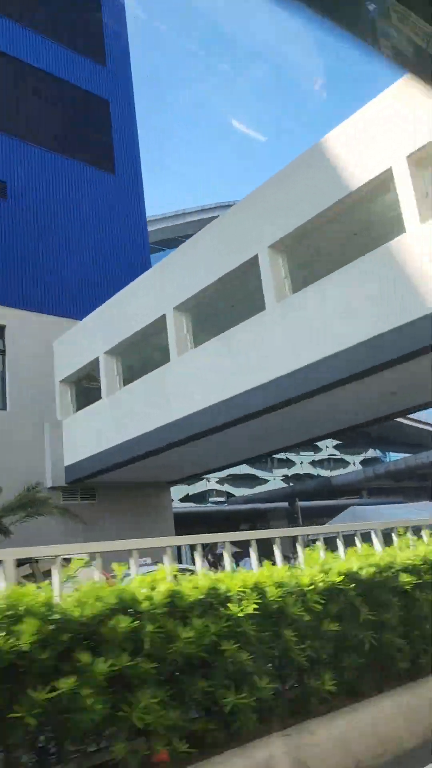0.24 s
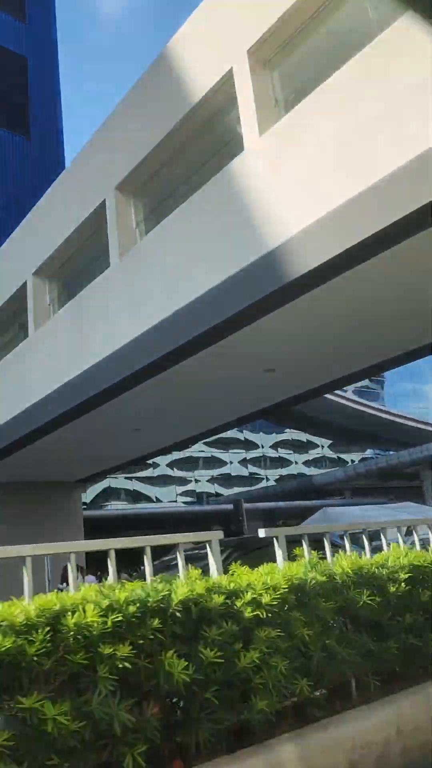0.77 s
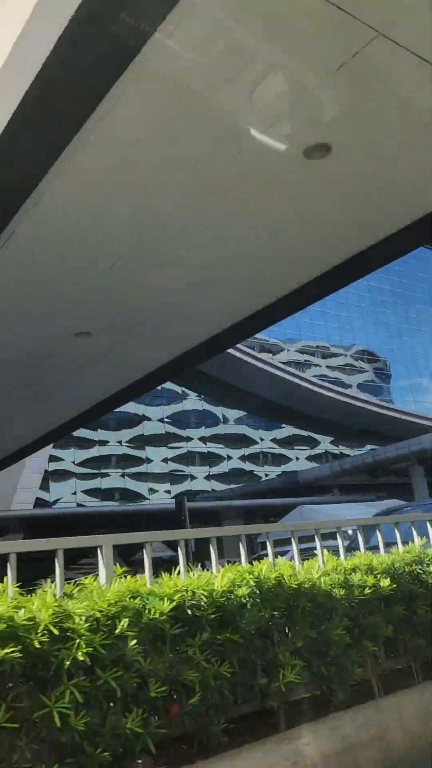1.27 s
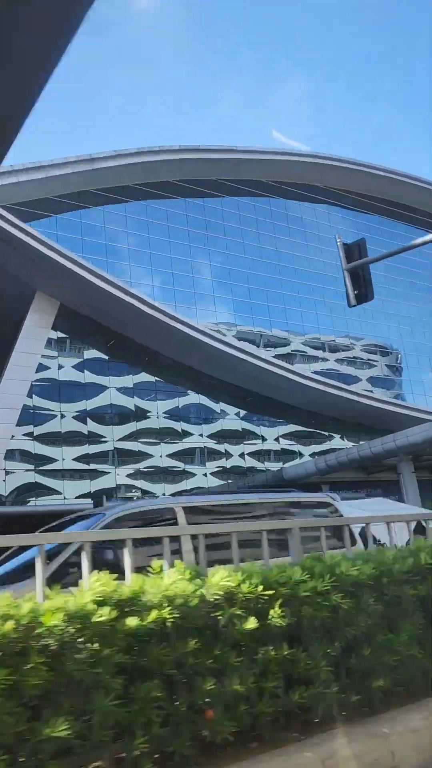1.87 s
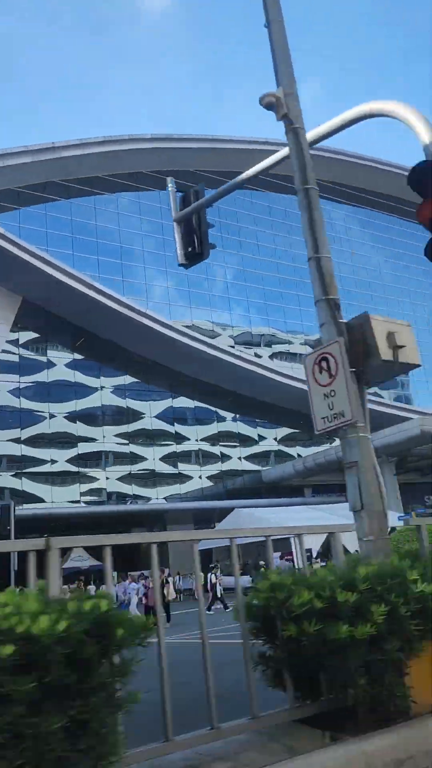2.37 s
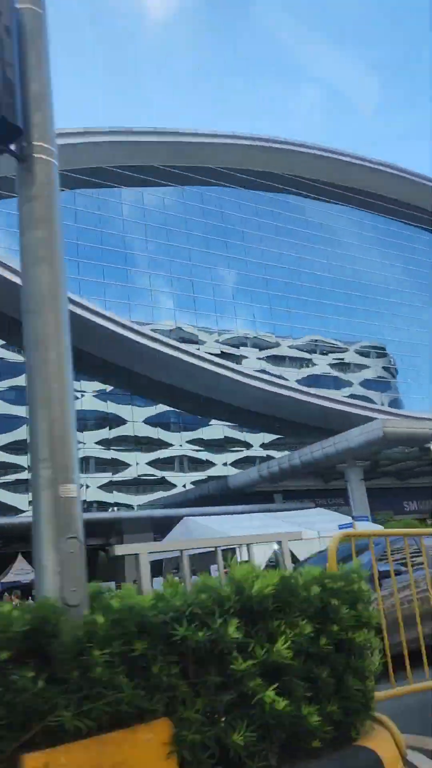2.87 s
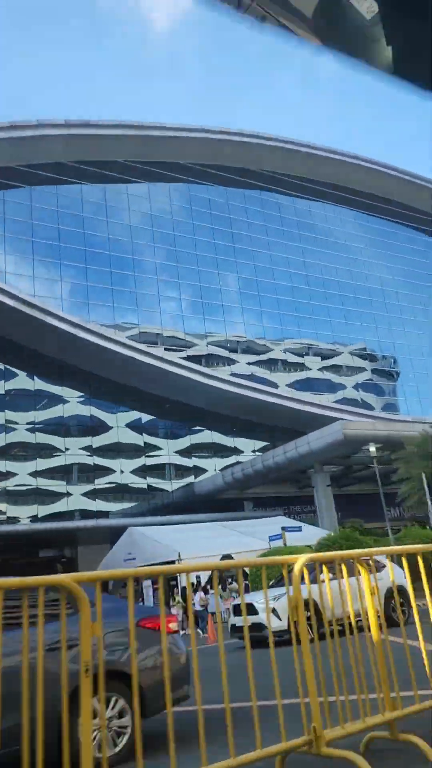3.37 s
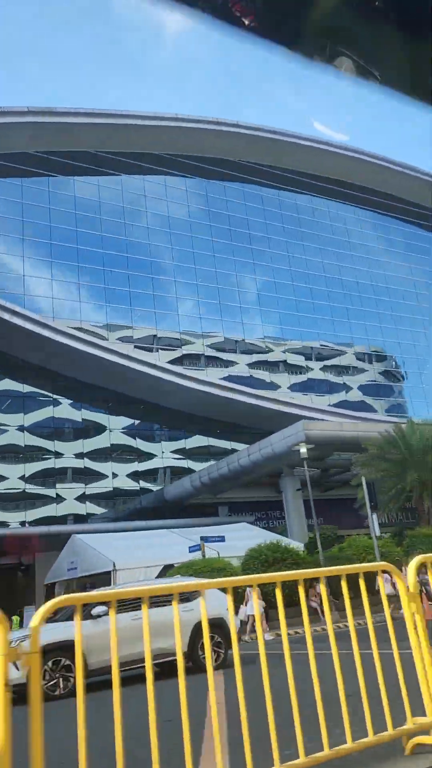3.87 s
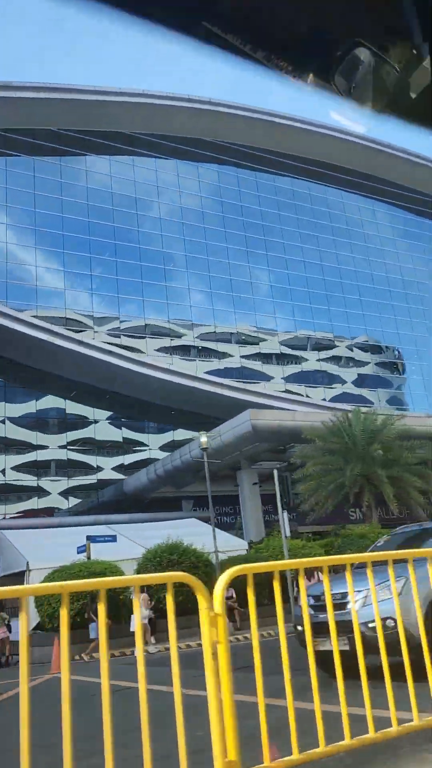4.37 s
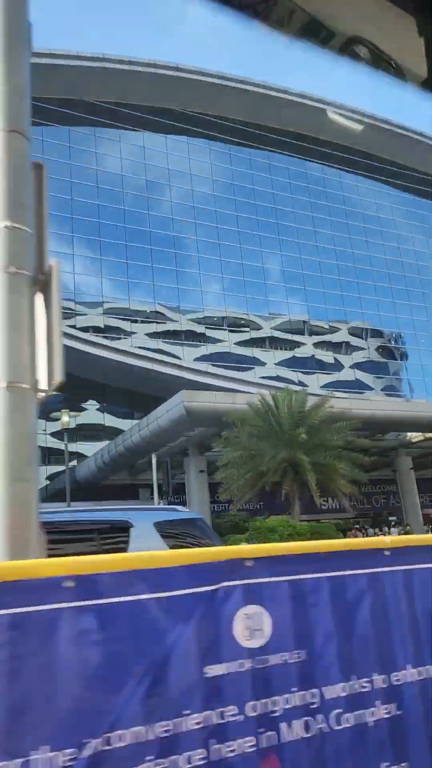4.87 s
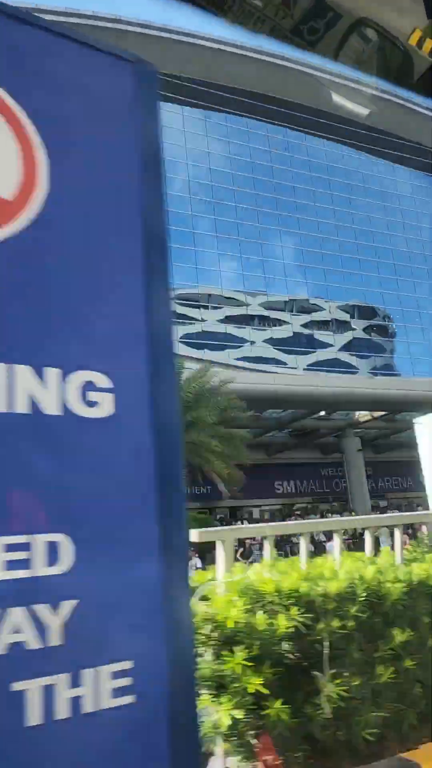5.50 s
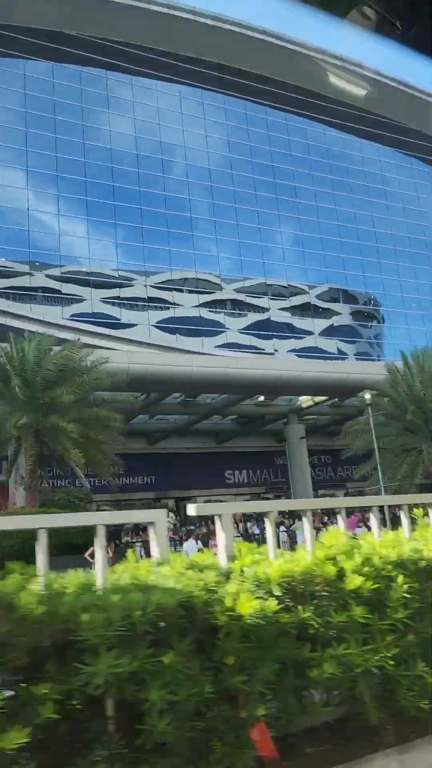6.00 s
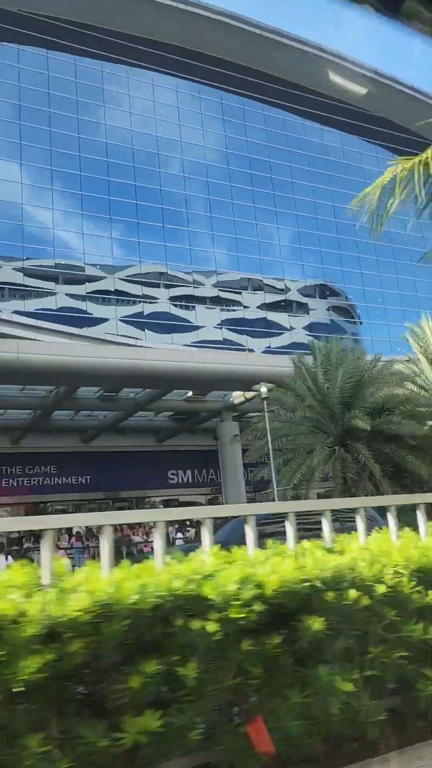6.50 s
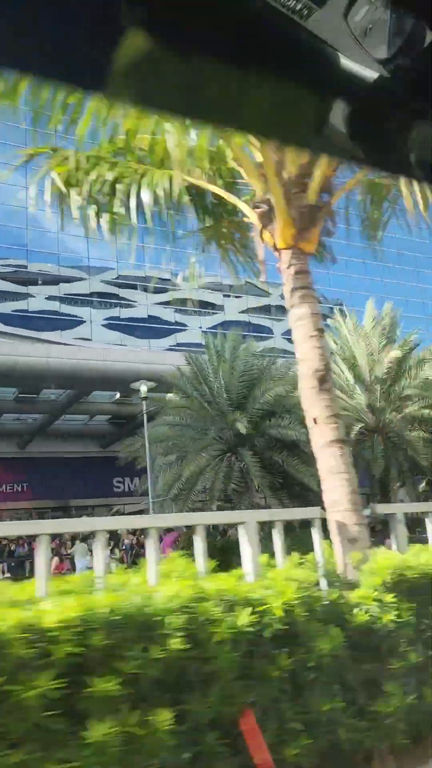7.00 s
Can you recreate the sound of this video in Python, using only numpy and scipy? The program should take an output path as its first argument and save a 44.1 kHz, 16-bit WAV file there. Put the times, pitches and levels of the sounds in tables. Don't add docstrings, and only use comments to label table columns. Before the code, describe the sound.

Low booming cabin drone on rough asphalt, with a cluster of bumps, rattling plastic and two sharp snaps, then rhythmic seam thuds before easing.

```python
import sys
import numpy as np
from scipy import signal
from scipy.fft import rfft, irfft, next_fast_len
from scipy.io import wavfile
from scipy.ndimage import uniform_filter1d

SR = 44100
rng = np.random.default_rng(int(sys.argv[2]) if len(sys.argv) > 2 else 0)


def wav_out(sig):
    wavfile.write(sys.argv[1], SR, np.round(np.clip(np.atleast_2d(sig).T, -1, 1) * 32767).astype(np.int16))


def boost_factor(decibels):
    exponent = np.asarray(decibels, float) / 20
    return 10 ** exponent


N = 319706
SIZE = next_fast_len(N)
HZ = np.maximum(np.arange(SIZE // 2 + 1) * SR / SIZE, 1)
T = np.arange(N) / SR

# frequency in [Hz], density in [dB per Hz].
ROAD_COLOUR = [(7.1, -48.5), (12, -9), (44, 9), (102, -1), (182, -10), (220, -17.5), (311, -20.5),
               (350, -23), (400, -23), (524, -25), (566, -29.5), (648, -31), (741, -37), (916, -33),
               (1200, -56.5), (1560, -81.5), (2640, -120)]
# frequency in [Hz], density in [dB per Hz].
AIR_COLOUR = [(590, -42.5), (1000, 4.5), (1170, -5), (1290, 0), (1530, -6.5), (1680, -4.5), (1820, -7),
              (2040, -6), (3620, -16), (5790, -17), (6420, -15.5), (8950, -29.5), (11300, -33.5),
              (15500, -37.5)]
# pitch in [Hz], width in [Hz], lift in [dB].
CABIN_MODES = [(28, 7.9, 2.5), (51, 26, 8), (88.3, 13.7, 9), (120.4, 22, 7), (183, 15, 4), (401.3, 39, 5.5),
               (1015, 120, 2.5), (1672, 81, 4), (1982, 41, 3.5), (2070, 160, 3), (4380, 120, 1),
               (6500, 230, 2), (7460, 150, 5), (10300, 170, 5), (13600, 1100, 5.5), (15000, 1300, 6.5)]
# frequency in [Hz], likeness in [0-1].
PORT_LIKENESS = [(60, 1), (130, 0.99), (290, 0.96), (640, 0.77), (1410, 0.22), (3100, 0.1), (6820, 0),
                 (15000, 0.02)]
# frequency in [Hz], left minus right in [dB].
PORT_LEAN = [(60, 1), (110, -0.4), (200, 0.5), (380, 0), (700, -2), (1290, 0), (2380, -7), (4400, -0.5),
             (8120, -5), (15000, 1)]
# frequency in [Hz], phase lead in [radians].
PORT_LEAD = [(30, 0.15), (150, 0.05), (600, 0.0), (950, 2), (1210, 2), (1980, 7.5), (2500, 7.5), (4570, 0),
             (5510, -2), (7060, -4.5), (9910, -24.5), (10400, -14.5), (10900, -15), (12900, -26.5),
             (15200, -22.5)]
# time in [s], level in [dB].
ROUGHNESS = [(0, 0.5), (2.3, 1), (2.45, 4), (3.45, 3), (3.58, -2.5), (4.05, 0.5), (4.6, 1.5), (5.7, 1),
             (6.0, 2), (6.2, -3), (7.25, -4.5)]
# time in [s], level in [dB].
RUSH_LEVEL = [
    (0, 1),
    (.3, -0.5),
    (3.05, 0.5),
    (3.51, -2.5),
    (3.8, -4),
    (4.4, -3),
    (5.73, -2),
    (6.14, -4),
    (7.25, -3.5),
]
# centre in [Hz], level in [dB], share of coarseness, share of rush.
BODY_PARTS = [
    (50, -23, 0.96, .01),
    (100, -23.5, 0.7, 0.9),
    (175, -27.5, 1, 0.36),
    (400, -32.5, 0.37, 1),
]
# time in [s], swell in [dB], pitch where the body answers in [Hz].
WHEEL_BUMPS = [(.05, 5.5, 50), (.24, 6.5, 67), (.40, -2, 45), (.79, 4.5, 175), (1.01, 6.5, 175),
               (1.09, 8.5, 50), (1.282, 6.5, 60), (1.48, -1, 50), (1.62, 0, 50), (1.7, 3.5, 100),
               (1.78, 5, 50), (1.95, 6, 100), (2.02, 9, 158), (2.3, 4.5, 150), (2.5, 16.5, 57.6),
               (2.61, 3, 141), (2.2, 4.5, 140), (2.69, -24, 65.6), (2.8, 7.5, 50), (2.0, 1, 140),
               (3.2, 2, 190), (3.06, 6.5, 50), (3.229, 5.5, 128), (3.39, 4.5, 65), (2.53, 3.5, 453),
               (3.03, 4.5, 450), (3.24, 6.5, 450), (3.671, 5, 113), (3.78, -14, 130), (6.15, 1, 140),
               (6.78, -12, 100), (6.94, -6, 50), (7.13, 12, 105)]
# time in [s], swell in [dB], pitch where the body answers in [Hz].
PAVING_SEAMS = [(4.18, 10.5, 77.6), (4.33, 3.5, 60), (4.43, 8, 100), (4.6, 5, 60), (4.68, 5, 80),
                (4.82, 5, 85.4), (4.96, 11, 79), (5.1, 6, 61.5), (5.11, 11.5, 175), (5.25, 7.5, 55),
                (5.39, 16, 66), (5.479, 17, 74), (5.62, 15.5, 68), (5.73, 9, 55), (5.94, 6.5, 151),
                (4.9, -0.5, 139), (4.5, -2, 150), (5.33, -7.5, 400), (5.449, 3.5, 400), (5.7, 1.5, 400),
                (4.28, -4, 100)]
# time in [s], pitch in [Hz], length in [s], peak in [dB].
MODE_RINGS = [(0.217, 119.5, 0.18, -17), (0.198, 57.1, 0.11, -21.5), (0.413, 85.2, 0.094, -19.5),
              (.75, 47.8, 0.17, -21), (0.747, 183, 0.086, -24), (1.076, 94.9, 0.06, -20),
              (1.316, 94, 0.063, -14.5), (1.298, 121.8, .1, -18), (1.896, 92.1, 0.11, -18),
              (2.097, 120.8, 0.13, -23), (2.417, 122, 0.079, -19), (2.592, 133.4, 0.076, -19),
              (3.056, 95, 0.088, -19.5), (3.222, 119.1, 0.067, -15.5), (3.673, 121, .06, -19.5),
              (1.55, 100, 0.09, -22.5), (3.447, 100, 0.066, -22), (4.2, 91.7, 0.054, -22),
              (4.397, 94, 0.097, -18.5), (4.62, 100, .06, -23), (4.952, 121.1, 0.083, -21),
              (4.695, 187.8, .1, -27), (4.82, 93.1, 0.066, -18), (4.85, 55.16, 0.24, -16.5),
              (5.097, 56.1, .07, -16), (5.7, 120, 0.092, -19), (5.75, 57, 0.066, -17.5),
              (6.0, 158, 0.08, -25), (7.103, 90.76, 0.11, -20)]
# time in [s], peak in
# [dB], pitch in [Hz], left minus right in [dB], ring t60 in [s].
PANEL_KNOCKS = [(2.422, -11, 338, 0, 0.059), (2.596, 0.5, 218, 13.5, 0.03), (2.696, -20, 295, 2, 0.092),
                (2.751, -11, 454, 2, 0.039), (2.842, -11, 482, -3, 0.056), (2.907, -13, 292, 17, 0.062),
                (2.961, -15.5, 227, 0, 0.1), (3.072, -15.5, 300, 1.5, 0.074), (3.153, -19, 264, 2, 0.023),
                (3.375, -19, 303, 3, 0.15), (3.662, -18.5, 317, 1, 0.17), (3.834, -21.5, 426, 1, 0.085),
                (4.373, -16, 294, -2, 0.096), (4.445, -20, 243, -5, 0.052), (4.485, -23, 293, -1, 0.11),
                (4.657, -19, 307, 3.5, 0.15), (4.791, -25.5, 355, 4, 0.31), (4.922, -24, 418, -2, 0.1),
                (4.971, -16.5, 306, 5, 0.061), (5.084, -16.5, 234, 3, 0.054), (5.244, -19, 304.5, 3, 0.11),
                (5.415, -8.5, 270, 1.5, 0.065), (5.663, -23.5, 247, 1, 0.2), (5.883, -20.5, 411, 1, 0.077),
                (2.446, -14.5, 400, 3, 0.062), (2.519, -26, 950, 0, 0.051), (2.83, -26.5, 970, 0, 0.044),
             (2.857, -21, 740, 2, .04), (3.021, -30, 932, 0, 0.071), (3.18, -26, 940, 0, 0.042),
             (2.485, -16.5, 570, -1, 0.04), (2.556, -10.5, 303, 2, 0.063), (2.762, -21, 600, -2, 0.037),
             (2.903, -4, 450, -1, 0.026), (2.989, -18, 520, -2, 0.053), (3.02, -18, 326, 0, 0.05),
             (3.092, -13, 302, -1, 0.061), (3.155, -20.5, 434, 3, 0.051), (3.205, -19.5, 530, -4, 0.056),
             (3.245, -24, 620, -3, 0.055), (3.299, -18, 458, -1, 0.076), (3.426, -27, 547, -4, 0.054),
             (3.462, -23, 302, 2, 0.056), (4.114, -34, 437, -1, 0.038), (4.163, -31, 545, 3, 0.044),
             (4.198, -22, 484, 0, 0.046), (4.239, -28, 400, -1, 0.055), (4.718, -28, 450, -4, 0.04),
             (4.964, -19, 402, 2, 0.083), (5.076, -19, 424, -4, 0.073), (5.099, -13.5, 310, 4, 0.055),
             (5.426, -15, 467, 2, 0.035), (4.488, -20, 446, -1, 0.036), (4.792, -25, 420, 0, 0.055),
             (4.918, -20, 480, 0, .04), (5.503, -25.5, 438, -2, 0.1), (5.701, -26, 428, -4, 0.073),
             (5.782, -20.5, 400, -2, .06), (6.563, -38, 523, -2, 0.038), (6.798, -31, 458, 3, 0.036)]
# time in [s], mean level over 9 ms in [dB], pitch in [Hz], lift at the pitch in
# [dB], left minus right in [dB].
PLASTIC_TICKS = [(2.4445, -40.5, 3150, 14, 4.5), (2.5114, -46, 3300, 4, 0), (2.7149, -46, 3160, 15, 1),
                 (2.7517, -51.5, 3600, 6, -3), (2.76, -53, 9000, 0, -4), (2.5, -54, 11000, 3, 1),
                 (2.8356, -51.5, 4500, 6, -5.5), (2.856, -52, 7000, 1, 2), (2.864, -48, 6800, 5, 0),
                 (2.879, -50, 8000, 0, -1), (2.888, -49.5, 4000, -1, -1.5), (2.897, -45, 6800, 8, 3),
                 (2.904, -43.5, 6800, 11, 6), (3.026, -52.5, 2320, 8, 0), (3.0456, -48.5, 6000, 12, -5.5),
                 (3.099, -58.5, 9000, 1, -4.5), (3.1554, -55.5, 13000, 0, -1), (3.17, -57.5, 14000, 4, 1),
                 (3.2613, -54, 13000, 3, -0.5), (3.268, -56.5, 8000, 1, 1), (3.21, -50, 2000, 3, -1),
                 (3.23, -51, 2000, 3.5, -1), (3.4, -57, 5000, 0, -7), (4.218, -51, 8000, 2, -1),
                 (4.226, -58.5, 12000, 1, -2), (4.269, -51, 12000, 2.5, -3.5), (4.603, -54.5, 13100, 5, -6),
                 (4.7293, -56.5, 6040, 3.5, -1.5), (4.9484, -57.5, 12000, 4, -3.5),
                 (5.5742, -58.5, 2800, 5, -7), (5.677, -49, 4000, 1.5, 0.5), (5.694, -54, 3000, 2, -0.5),
                 (5.711, -51.5, 4500, 2, 1), (5.735, -53.5, 4000, 1, -3), (5.764, -52.5, 4500, 1, -2.5),
                 (5.79, -59, 11900, 3, -4.5)]
# time in [s], length in
# [s], level in [dB].
TRIM_RATTLES = [(.004, .008, -41), (1.3, .05, -59), (2.5, .02, -53), (2.545, .03, -54), (2.755, .012, -58),
                (2.865, .022, -50.5), (2.9, .012, -51), (3.022, .012, -55), (3.048, .006, -52),
                (3.1, .01, -58), (3.18, .03, -56), (3.265, .015, -52), (3.31, .02, -57), (3.4, .035, -56),
                (4.24, .04, -59), (5, .045, -59), (5.084, .02, -59), (5.438, .014, -57), (5.7, .03, -54.5),
                (5.77, .025, -55), (7.249, .005, -42)]
# time in [s], left minus right in [dB].
DASH_SNAPS = [
    (2.5947, 13.5),
    (2.9094, 13.5),
]
# low edge in [Hz], high edge in [Hz], peak delay in [s], length in [s],
# first snap in [dB], second snap in [dB].
SNAP_PEEL = [(650, 1200, .001, .0012, -36, -38), (1200, 2000, .001, .0008, -37, -39),
             (2000, 2600, .0009, .0007, -41, -39), (2600, 3400, .0007, .0006, -43, -40),
             (3400, 4400, .0005, .0006, -45, -44), (4400, 5700, .001, .0006, -48, -46),
             (5700, 7500, .0016, .0005, -40, -36), (7500, 9700, .0021, .0005, -52, -52),
             (9700, 12500, .0023, .0004, -52, -49), (12500, 15700, .0024, .0004, -49, -52)]
# pitch in [Hz], width in [Hz], level against the hiss in [dB].
SLAT_WHISTLES = [(6270, 27, -24), (1652, 16, -17), (1988, 12, -21), (4760, 27, -29.5), (9629, 14, -41.5)]
# time in [s], level in [dB].
SLAT_SINGING = [
    (0, 6.5),
    (1.3, 5),
    (2.5, 4),
    (2.9, -11),
    (4, -6),
    (6, -9.5),
    (7.25, 0),
]
# time in [s], pitch in [Hz], length in [s], level in [dB].
BRAKE_SQUEAK = (2.32, 10850, .03, -70)


def read(table):
    hz, value = np.transpose(table)
    return np.interp(np.log(HZ), np.log(hz), value)


def between(lo_hz, hi_hz):
    return 1 / np.sqrt((1 + (lo_hz / HZ) ** 16) * (1 + (HZ / hi_hz) ** 16))


def walk(rate):
    hold = int(SR / rate)
    levels = np.repeat(rng.standard_normal(N // hold + 1), hold)
    return 1.84 * uniform_filter1d(uniform_filter1d(levels, hold), hold)[:N]


def pan_gain_db(pan_db):
    return np.array([[pan_db], [-pan_db]]) / 2


def cabin_field():
    common, *own = rfft(rng.standard_normal((3, SIZE)))
    alike = np.clip(read(PORT_LIKENESS), 0.18, .999)
    lift_db = sum(db / (1 + (2 * (HZ - hz) / width) ** 2) for hz, width, db in CABIN_MODES)
    sign = np.array([[1], [-1]])
    shared = np.sqrt(alike) * common * np.exp(.5j * sign * read(PORT_LEAD))
    ports = shared + np.sqrt(1 - alike) * np.array(own)
    return ports * boost_factor(lift_db + sign * read(PORT_LEAN) / 2)


def flutter(spectra, lo_hz, hi_hz, shake_db, flicker_db, rate):
    out = 0
    shake = shake_db * walk(rate)
    spectra = spectra * between(lo_hz, hi_hz)
    for step in np.arange(np.floor(2 * np.log2(lo_hz)), 2 * np.log2(hi_hz) + 1):
        band = np.cos(np.pi / 2 * np.clip(2 * np.log2(HZ) - step, -1, 1)) ** 2
        sound = irfft(spectra * band, SIZE)[:, :N]
        out = out + sound * boost_factor(shake + flicker_db * walk(rate))
    return out


def follow(x, level_db, steady):
    span = SR // 16
    power = uniform_filter1d(uniform_filter1d(x.mean(axis=0) ** 2, span), span)
    x = x / np.maximum(power, .05 * power.mean()) ** (steady / 2)
    return x * boost_factor(level_db) / np.std(x.mean(axis=0))


def place_burst(burst, db, pan_db):
    level = np.sqrt((burst.mean(axis=0) ** 2).sum() / (.009 * SR))
    return burst / level * boost_factor(db - 3 + pan_gain_db(pan_db) - abs(pan_db) / 8)


def squeak():
    s, hz, length, db = BRAKE_SQUEAK
    return boost_factor(db) * np.exp(-((T - s) / length) ** 2) * np.sin(2 * np.pi * hz * T)


def vent(hiss_db, fizz_db):
    spectra = cabin_field() * boost_factor(read(AIR_COLOUR))
    hiss = flutter(spectra, 1100, 8500, shake_db=.6, flicker_db=.6, rate=40)
    fizz = flutter(spectra, 8500, 16000, shake_db=.8, flicker_db=.6, rate=40)
    return follow(hiss, hiss_db, steady=.4) + follow(fizz, hiss_db + fizz_db, steady=.4)


def whistles(hiss_db):
    shape = sum(boost_factor(db) / np.sqrt(width) / (1 + (2 * (HZ - hz) / width) ** 2)
                for hz, width, db in SLAT_WHISTLES)
    noise = rfft(rng.standard_normal((3, SIZE)))
    song = irfft((noise[0] + noise[1:]) * shape, SIZE)[:, :N] * np.sqrt(SR / np.pi)
    return song * boost_factor(hiss_db + np.interp(T, *np.transpose(SLAT_SINGING)))


def rattles():
    t = T[::32]
    swell = sum(boost_factor(db) * np.exp(-((t - s) / length) ** 2) for s, length, db in TRIM_RATTLES)
    grains = rng.standard_normal((2, N)) * boost_factor(3.5 * walk(300))
    colour = boost_factor(read(AIR_COLOUR)) * np.clip(HZ / 3000, 0, 5) ** .85
    grains = irfft(rfft(grains, SIZE) * colour, SIZE)[:, :N]
    return np.interp(T, t, swell) * grains / np.std(grains)


def ticks():
    out, t = np.zeros((2, N + SR)), T[:1024]
    bins_hz = np.maximum(np.arange(513) * SR / len(t), 1)
    fall = (1 - np.exp(-t / .0004)) * np.exp(-t / .005)
    lead_in = 100
    for s, db, hz, lift_db, pan_db in PLASTIC_TICKS:
        noise = rng.standard_normal((4, len(t)))
        crackle = (noise[0] + 1.2 * noise[1:3]) * fall * boost_factor(1.5 * noise[3])
        colour = bins_hz ** -.9 / (1 + (1200 / bins_hz) ** 4)
        colour = colour / np.sqrt(1 + (bins_hz / hz / 2.2) ** 4)
        colour = colour * boost_factor(lift_db / (1 + (6 * np.log(bins_hz / hz)) ** 2))
        burst = irfft(rfft(np.roll(crackle, lead_in, axis=1)) * colour)
        i = int(s * SR) - lead_in
        out[:, i:i + len(t)] += place_burst(burst, db, pan_db)
    return out[:, :N]


def snaps():
    out, t = np.zeros((2, N)), T[:600]
    for k, (s, pan_db) in enumerate(DASH_SNAPS):
        i = int((s - .003) * SR)
        for lo_hz, hi_hz, peak, length, *dbs in SNAP_PEEL:
            noise = rng.standard_normal((3, len(t)))
            late = t - .003 - peak + 1 / (hi_hz - lo_hz) / 2
            crack = 6 * (np.abs(late) < .6 / SR)
            burst = (noise[0] + .7 * noise[1:] + crack) * np.exp(-(late / length) ** 2)
            band = signal.butter(2, [lo_hz, hi_hz], "band", fs=SR, output="sos")
            out[:, i:i + len(t)] += place_burst(signal.sosfilt(band, burst), dbs[k], pan_db)
    return out


def knocks():
    out, t = np.zeros((2, N + SR)), T[:SR // 4]
    dull = signal.butter(4, [160, 640], "band", fs=SR, output="sos")
    push = 1 - np.exp(-(t / 0.0038) ** 2)
    for s, db, hz, pan_db, t60 in PANEL_KNOCKS:
        fall = push * np.exp(-np.log(1000) * t / max(t60, .01))
        scatter = signal.sosfilt(dull, fall * rng.standard_normal((2, len(t))))
        hit = fall * np.sin(2 * np.pi * hz * t) + boost_factor(6) * scatter
        i = int((s - .002) * SR)
        out[:, i:i + len(t)] += hit * boost_factor(db - 0.14 + pan_gain_db(pan_db))
    return out[:, :N]


def rings():
    s, hz, length, db = np.transpose(MODE_RINGS)[:, :, None]
    t = T[::32]
    swell = boost_factor(db) * np.exp(-((t - s) / length) ** 2)
    tone = swell * np.sin(2 * np.pi * (hz * t + rng.random((len(s), 1))))
    return signal.resample(tone.sum(axis=0), 32 * len(t))[:N]


def ride(rough_db, rush_db):
    bump_s, rebound, reach_oct = .03, .35, .6
    s, db, bump_hz = np.transpose(WHEEL_BUMPS + PAVING_SEAMS)[:, :, None]
    t = T[::64]
    u = ((t - s) / bump_s) ** 2
    swell = db * (np.exp(-u) * (1 + rebound) - rebound * np.exp(-u / 6))
    levels = []
    for part_hz, level_db, coarse, fast in BODY_PARTS:
        answer = np.exp(-(np.log2(bump_hz / part_hz) / reach_oct) ** 2)
        bumps_db = np.interp(T, t, (swell * answer).sum(axis=0))
        levels.append(level_db + coarse * rough_db + fast * rush_db + bumps_db)
    return levels


def road(boom_db, floor_db, tyre_db, drone_db):
    spectra = cabin_field() * boost_factor(read(ROAD_COLOUR))
    out = 0
    for lo_hz, hi_hz, db in ((10, 75, boom_db), (75, 140, floor_db), (140, 215, tyre_db)):
        part = irfft(spectra * between(lo_hz, hi_hz), SIZE)[:, :N]
        out = out + follow(part, db, steady=0.72)
    drone = flutter(spectra, 232.6, 1500, shake_db=0.0, flicker_db=0.98, rate=12)
    return out + follow(drone, drone_db, steady=0.057)


def scene():
    rough_db = np.interp(T, *np.transpose(ROUGHNESS))
    rush_db = np.interp(T, *np.transpose(RUSH_LEVEL))
    hiss_db = -49
    fizz_db = -19.5 + 0.26 * rough_db
    air = vent(hiss_db + rush_db, fizz_db) + whistles(hiss_db)
    plastic = rattles() + ticks() + snaps()
    body = knocks() + rings() + road(*ride(rough_db, rush_db))
    return squeak() + air + plastic + body


def low_pass(x):
    return signal.sosfilt(signal.butter(12, 15784, fs=SR, output="sos"), x)


def record(dry):
    mix = np.tanh(0.66 * dry) / 0.72
    return low_pass(mix)


dry = scene()
out = record(dry)
wav_out(out)
```